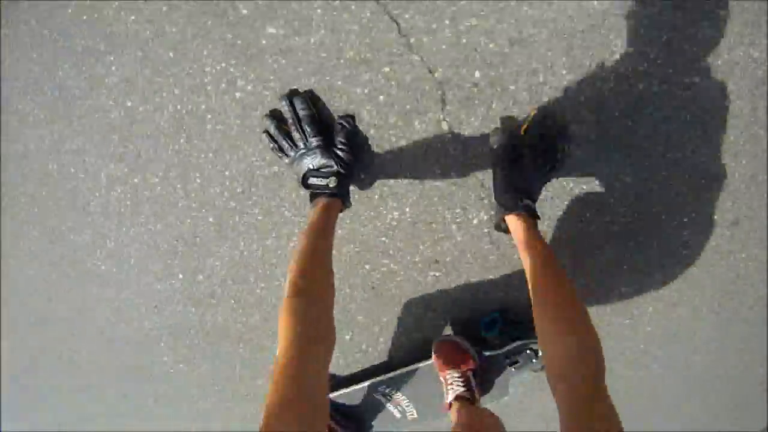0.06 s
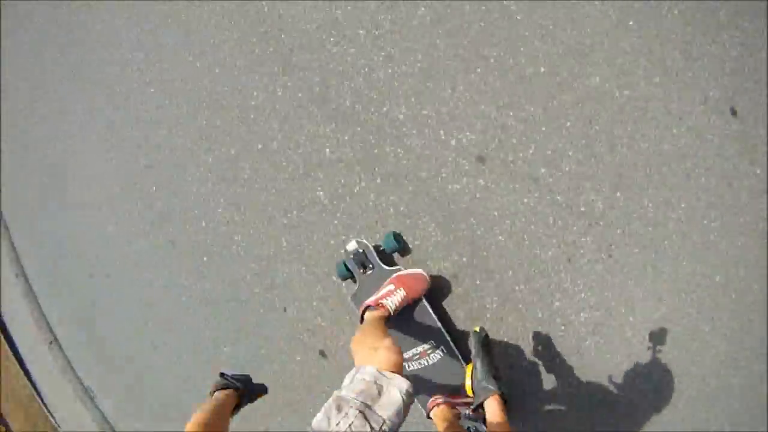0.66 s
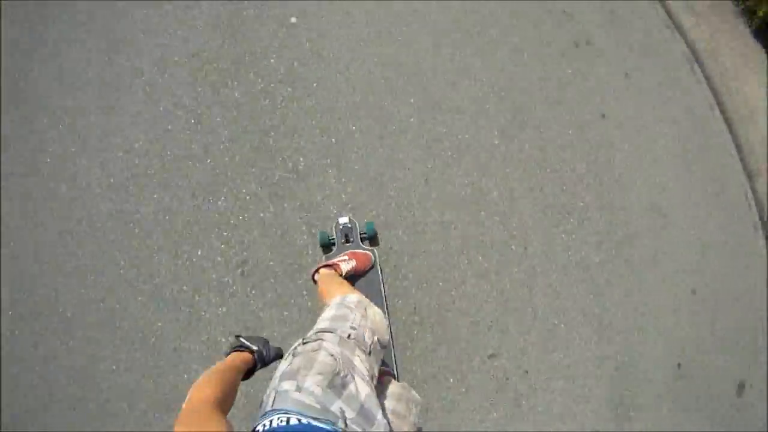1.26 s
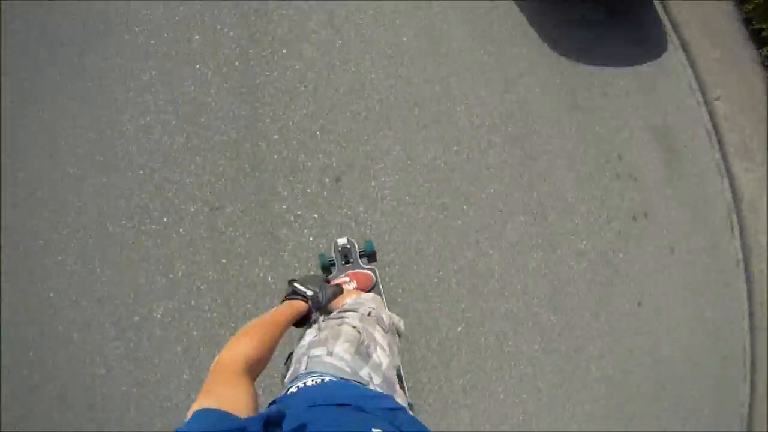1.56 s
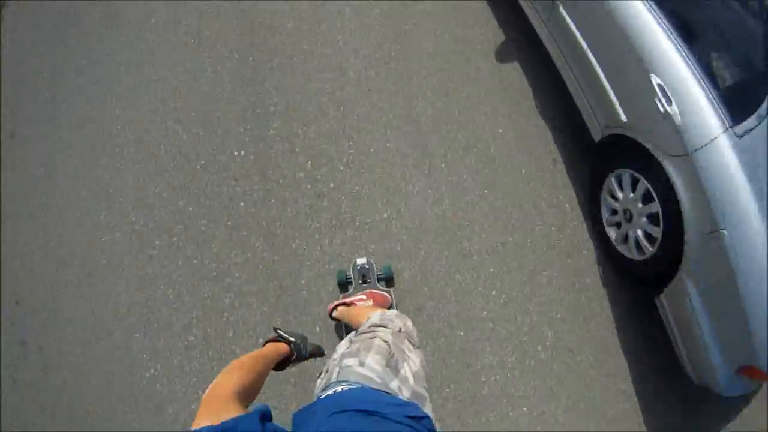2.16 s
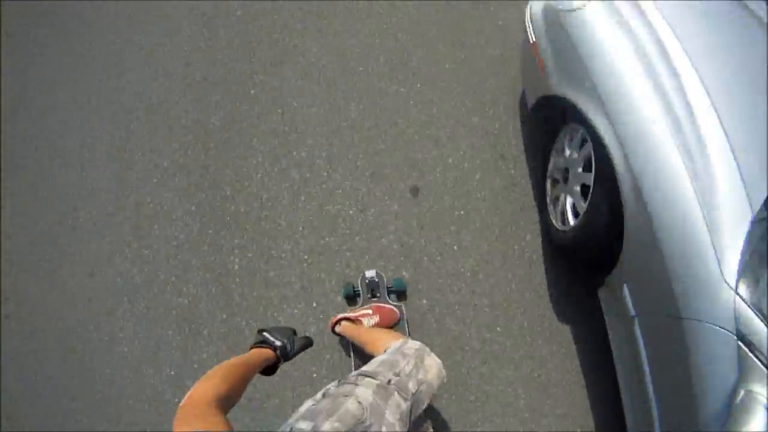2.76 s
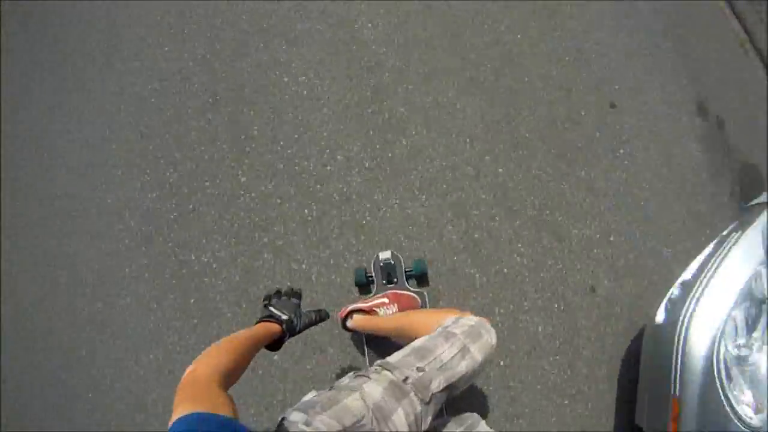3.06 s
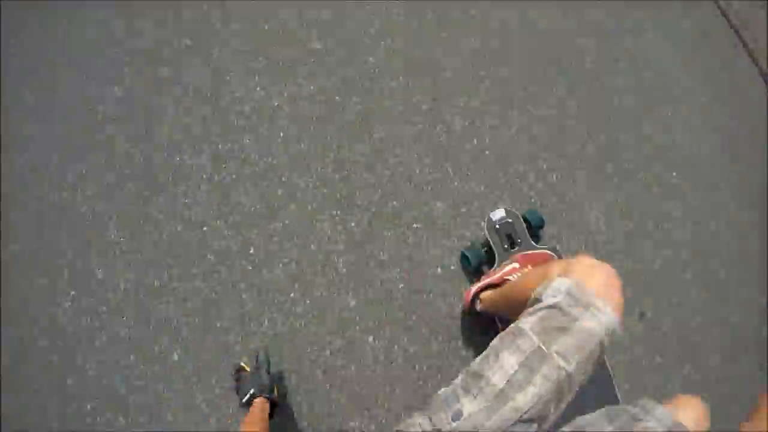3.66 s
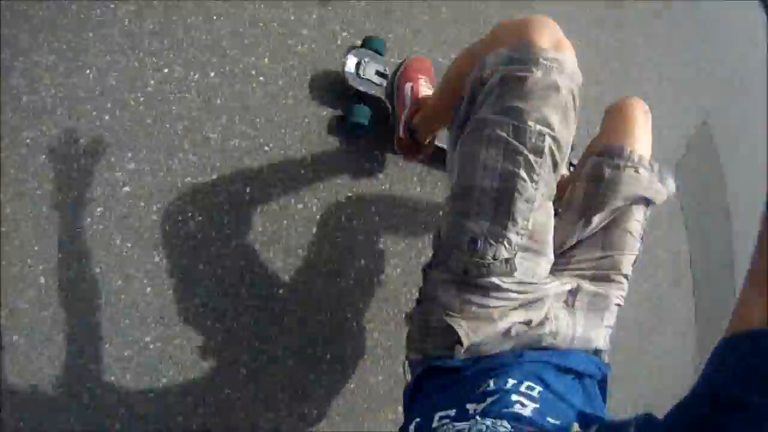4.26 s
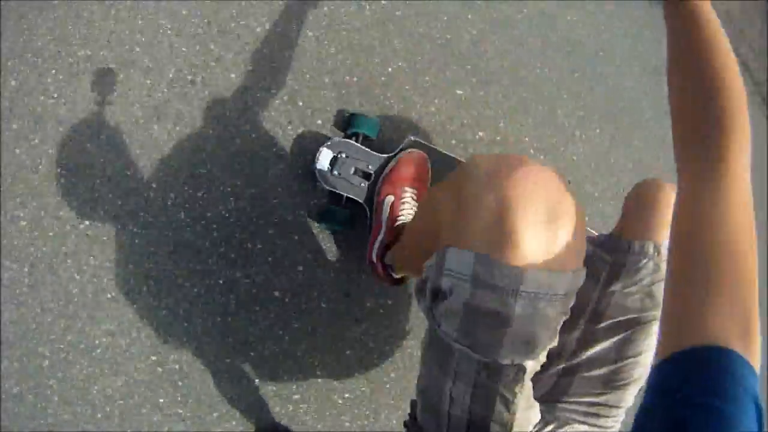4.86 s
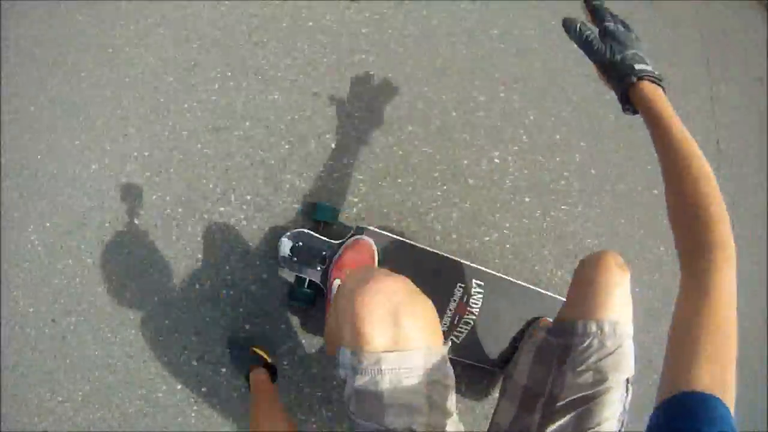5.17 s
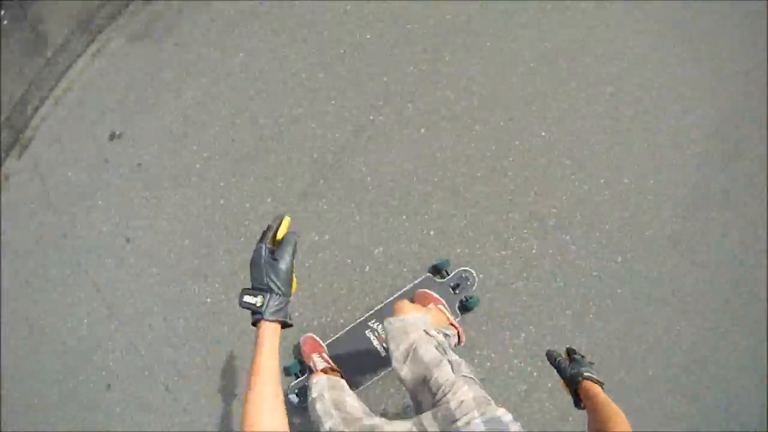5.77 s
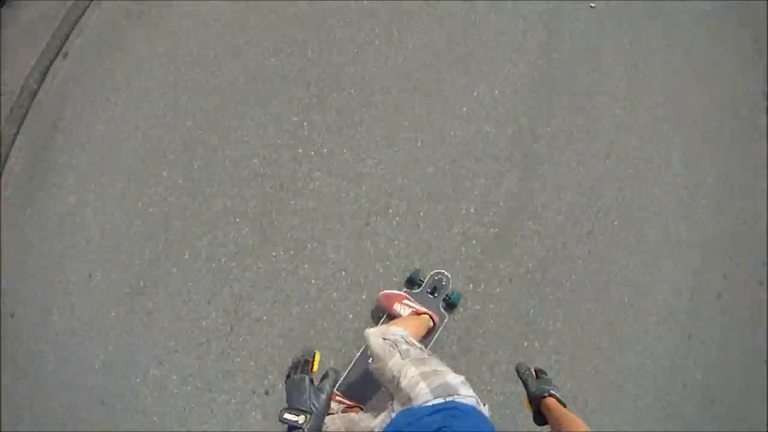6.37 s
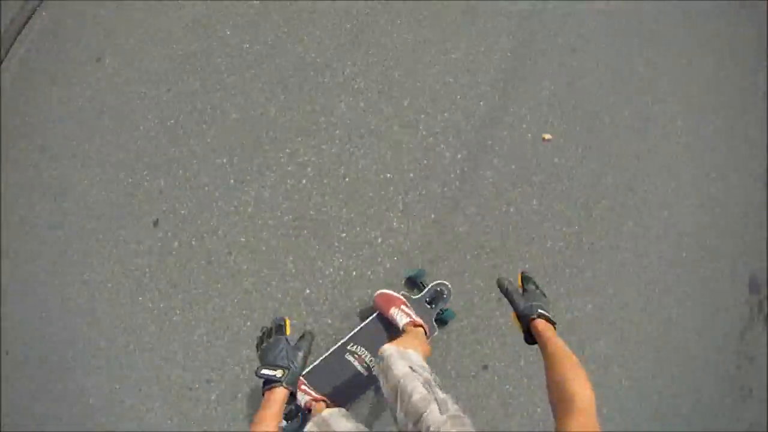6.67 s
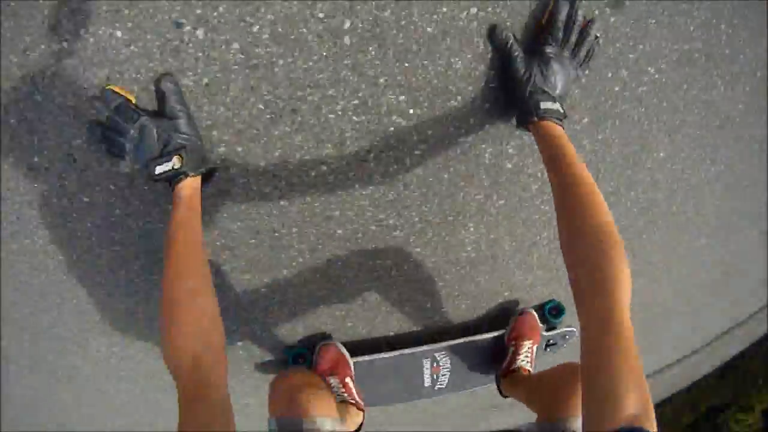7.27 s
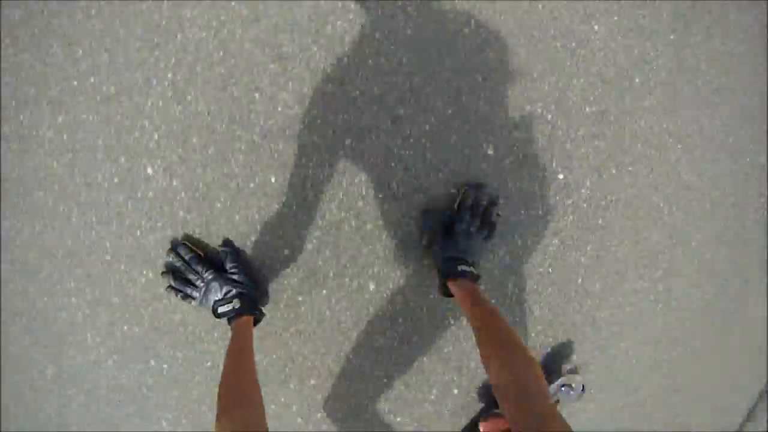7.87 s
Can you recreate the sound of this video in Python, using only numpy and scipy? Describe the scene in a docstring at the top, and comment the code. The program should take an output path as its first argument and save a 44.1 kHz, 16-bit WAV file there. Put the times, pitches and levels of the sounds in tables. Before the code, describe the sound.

Hard glove pucks rasp briefly across asphalt, then longboard wheels patter and rumble along the street while wind gusts on a helmet-mounted microphone. The wheels break into a longer sideways scrape that swells before they grip again. After more rolling and light scrubbing, the pucks hit the road and grind loudly, with a faint rising tone and knocks from the helmet mount. Everything sounds close and slightly boxy, with a glassy edge.

```python
"""An asphalt street: a longboard run, heard from a cased camera on the rider's helmet.
Three stick-slip slides: on glove pucks, on drifting wheels with one glove touching down, on pucks again.
The wheels patter over grit and scrub in carves; the deck rumbles, the mount clacks.
Short ticks and pops: flicked pebbles, a small rattle, a soft wind or cloth pop.
Wind buffets the case, which colours the road noise; a slow sample-and-hold adds a glassy treble."""
import sys
import numpy as np
from scipy import signal
from scipy.fft import rfft, irfft, next_fast_len
from scipy.io import wavfile
from scipy.ndimage import uniform_filter1d, map_coordinates

SR = 44100
rng = np.random.default_rng(int(sys.argv[2]) if len(sys.argv) > 2 else 0)


def waveform_to_disk(signal):
    """Save audio, clipped to [-1, 1], as 16-bit WAV at the path in sys.argv[1]."""
    frames = np.transpose(np.atleast_2d(signal))
    scaled = np.clip(frames, -1, 1) * 32767
    samples = np.round(scaled).astype(np.int16)
    wavfile.write(sys.argv[1], SR, samples)


N = 353681
TIME_S = np.arange(N) / SR
FREQ_HZ = np.fft.rfftfreq(8192, 1 / SR)

# slides: start/s, end/s, level/dB, fade/(dB/s), relative hiss/dB, body growth/(dB/s), grip swell/dB,
# case weight, chatter/dB
SLIDES = [(0.0, 0.437, -26, 0, -20.5, -5, -4, 1.1, 0), (3.764, 5.245, -39.5, 1.5, -15, 0, 11.5, 0.73, 1.4),
          (7.315, 8.2, -33, 3, -12.5, 3.5, 0, 0.81, -0.1)]
# two rising tones in the scrape, one curve a slide: t/s, lower f/Hz, lower gain, upper gain
SCRAPE_TONES = [
    [(0.08, 1670, 1.2, 0.36), (0.22, 1780, 1.4, 0.11), (0.33, 1980, 2.1, 0.3), (0.43, 2070, 3.2, 0.54)],
    [(3.85, 1760, 0.41, 0.1), (4.0, 1760, 0.05, 0.7), (4.42, 1730, 0.05, 1.4), (4.68, 1950, 0.05, 1.9),
     (5.05, 2050, 0.05, 1.1), (5.15, 2270, 0.05, 0.1)],
    [(7.33, 1460, 0.1, 0.6), (7.46, 1670, 0.41, 1.9), (7.56, 1900, 0.28, 1.1), (7.66, 2130, 0.48, 0.4),
     (7.8, 2400, 0.09, 0.59), (7.98, 2540, 0.12, 1.5)],
]
# wheel noise, brighter under sideways load: t/s, level/dB, treble tilt/dB
ROLL = [(0.46, -45, 5.5), (0.68, -51.5, 1.5), (0.95, -50.5, -1), (1.48, -52.5, -3.5), (1.66, -55.5, -3),
        (1.81, -51.5, -3), (2.1, -55.5, -1.5), (2.38, -50.5, -2.5), (3.2, -49.5, -1), (3.65, -45.5, -1.5),
        (4.4, -45.5, 0.5), (4.75, -53.5, -0.5), (5.3, -53.5, 1), (5.52, -53, 1.5), (5.66, -54, -0.5),
        (6.5, -56.5, -3.5), (6.66, -49, -3.5), (7.2, -52.5, 1.5)]
# a loaded glove or wheel shakes rider and helmet: t/s, half length/s, level/dB
JUDDERS = [(0.07, 0.074, -35), (0.26, 0.076, -39.5), (4.367, 0.035, -51), (6.336, 0.039, -46)]
# pucks and wheels biting the road: t/s, level/dB, rise/s
BITES = [(.017, -30.5, 0.015), (.128, -24.5, 0.016), (.263, -27, 0.0044), (0.387, -24, 0.006),
         (0.425, -46, 0.0031), (3.768, -33, 0.0032), (3.776, -31, 0.0082), (3.833, -34.5, 0.0047),
         (3.862, -32, 0.0057), (4.1, -37, 0.0077), (4.483, -34, 0.022), (4.593, -36, .014),
         (5.074, -42, 0.0036), (5.878, -53, 0.012), (5.912, -46.5, 0.0045), (6.145, -56.5, 0.014),
         (7.234, -23, 0.0074), (7.26, -24.5, 0.0058), (7.271, -30, 0.018), (7.3042, -25, 0.0028),
         (7.312, -29, 0.0045)]
# mount jolts: t/s, relative clack/dB, clack cutoff/Hz, relative thud/dB
JOLTS = [(.177, -21.5, 900, -22), (0.351, -20, 1090, -25), (7.304, -24.5, 1610, -28),
         (7.369, -25.5, 900, -21), (7.49, -9.5, 800, -17), (7.503, -18, 500, -4.5), (7.563, -18, 800, -26),
         (7.576, -13.5, 2600, -3.5)]
# modes of mount and helmet: f/Hz, level/dB, t60/s
CLACK_MODES = [(186, -2, 0.026), (242, -8.5, 0.079), (586, 1.5, 0.012), (696, 4.5, 0.03), (860, 4.5, 0.01),
               (1360, 1.5, 0.032), (1803, 1, 0.035), (2170, -1, 0.021)]
THUD_MODES = [(35, -8.5, 0.26), (68.6, 1.5, 0.056), (110, -17, 0.092)]
# short ticks and pops: t/s, level/dB, centre f/Hz
TICKS = [(0.9, -53, 610), (0.962, -48, 700), (1.45, -55, 785), (3.292, -36.5, 2220), (3.608, -38.5, 2260),
         (3.612, -39, 1330), (4.288, -35.5, 1450), (5.56, -39.5, 2340), (5.658, -52, 1480),
         (5.761, -45, 1890), (5.9, -50, 1100), (6.296, -52.5, 860), (6.328, -49, 752), (7.15, -50, 3800)]
# wheels straightening after a slide: t/s, level/dB, fade/(dB/s)
WHINES = [(0.436, -47, 49), (5.24, -62, 19)]
# wheels scrubbing in carves: start/s, end/s, level/dB, fade/(dB/s)
CARVES = [(0.44, 1.1, -63, 10), (5.86, 6.26, -63.5, -2), (6.61, 6.84, -55.5, 8), (6.843, 7.25, -51.5, 20)]
# gusts as the rider swings round: t/s, half length/s, level/dB
GUSTS = [(0.113, 0.048, -42), (0.324, 0.065, -39), (4.014, 0.14, -40), (4.354, 0.078, -34.5),
         (4.537, 0.059, -27.5), (4.84, 0.18, -40), (5.933, 0.07, -31), (6.327, 0.091, -36),
         (6.8, 0.35, -42), (7.486, 0.17, -32.5)]
# camera case resonances: f/Hz, width/Hz, gain/dB
CASE_MODES = [(267, 33, 2.5), (406, 117, 6), (732, 330, 9), (1063, 87, 5), (1200, 160, 5.5), (1408, 120, 7),
              (1847, 390, 8), (2199, 240, 10), (2487, 285, 13), (2938, 210, 10), (3296, 81, 7.5),
              (3643, 390, 16.5), (4430, 130, -7), (3840, 37, 3.5), (4920, 170, 4), (5160, 210, -1.5)]
# source spectra: f/Hz, relative level/dB
FIRST_PUCK_SPECTRUM = [(180, -46), (300, -37), (893, -16.5), (1420, -6.5), (1570, -12), (1850, -5.5),
                       (2340, -12.5), (2530, -1), (3090, -11), (3680, -6), (6000, -11.5), (7800, -56),
                       (13200, -120)]
DRIFT_SPECTRUM = [(120, -27), (200, -21), (730, -13.5), (904, -20.5), (1060, -2.5), (1530, -13), (1840, 0),
                  (2090, -12), (2510, -0.5), (2740, -7.5), (3800, -16), (4330, -16), (4750, -14),
                  (6000, -22.5), (7800, -44), (13200, -120)]
LAST_PUCK_SPECTRUM = [(180, -55), (300, -28), (678, -12), (882, -14.5), (1090, -3.5), (1600, -3.5),
                      (1850, 0), (2150, -2.5), (2480, 1.5), (3090, -7), (3680, -9.5), (4500, -18),
                      (4900, -16.5), (6000, -18.5), (7800, -79), (13200, -120)]
ROLL_SPECTRUM = [(160, -52.5), (280, -6.5), (357, -9), (505, -6.5), (714, -2), (971, -7.5), (1060, -2),
                 (1560, -5.5), (1940, -1), (3330, -17.5), (3690, -19), (6000, -24.5), (7800, -70),
                 (13200, -120)]
RUMBLE_SPECTRUM = [(26, -12), (45, -11), (71, 2.5), (168, -13.5), (221, -14.5), (258, -14), (355, -27),
                   (400, -25.5), (520, -45), (880, -120)]
SCRUB_SPECTRUM = [(1000, -12), (2200, -2), (2900, -11), (3200, -9), (3450, -6), (3670, -10.5), (3950, -10),
                  (4450, -28.5), (4800, -14), (6000, -19)]
WIND_SPECTRUM = [(5, -8.5), (22, 4), (42, -3), (58, -2), (80, -12), (130, -41.5), (300, -33.5),
                 (1000, -50.5)]


def slide(row, spectrum, tones):
    """Stick-slip: clumps of tiny impacts, hissier at both ends where contact is light."""
    start_s, end_s, db, fade_db_s, hiss_db, growth_db_s, grip_db, case_weight, chatter_db = row
    length_s = end_s - start_s
    age_s = np.clip(TIME_S - start_s, 0, length_s)
    unload_s = 0.052 * length_s
    level_db = db - fade_db_s * age_s + grip_db * hump(end_s - 0.047, half_s=0.036)
    level_db += 0.4 * wander(rate_hz=19)
    light_db = 5 * np.exp(-age_s / 0.12) + 7.5 * hump(end_s - unload_s, unload_s)
    slips = grit(hits_per_s=3000, spread_db=3, bed=0.7) * gain(chatter_db * wander(rate_hz=68))
    scrape = coloured(slips, spectrum, case_weight)
    hiss = treble(scrape, edge_hz=3560)
    body = scrape - treble(scrape, edge_hz=2700)
    middle = scrape - hiss - body
    body_gain = gain(growth_db_s * (age_s - length_s / 2))
    sound = middle + body * body_gain + unit_rms(hiss) * gain(hiss_db + light_db)
    return (sound + scrape_tones(sound, tones)) * gain(level_db) * gate(start_s, end_s, edge_s=0.011)


def scrape_tones(scrape, tones, width_hz=193, upper_ratio=1.685):
    """Two rising, wavering tones in the scrape."""
    hz, lower, upper = curves(tones)
    hz = hz * (1 + 0.014 * wander(rate_hz=11))
    return sum(share * resonate(scrape, hz * ratio, width_hz) * gain(1.7 * wander(rate_hz=16))
               for ratio, share in [(1, lower), (upper_ratio, upper)])


def body_reflection(x, share, delay_s, sway):
    """Adds the echo off the rider's moving arms and body: a gliding comb."""
    lag_s = delay_s * (1 + sway * wander(rate_hz=0.33))
    echo = map_coordinates(x, [(TIME_S - lag_s) * SR], order=1)
    return (x + share * echo) / np.hypot(1, share)


def rolling(cruise_db=-49):
    """Wheels patter over stones; the deck rumbles along, less under sideways load."""
    level_db, tilt_db = curves(ROLL)
    stones = grit(hits_per_s=2200, spread_db=1, bed=1) * gain(1.16 * wander(rate_hz=16))
    patter = coloured(stones, ROLL_SPECTRUM, case_weight=0.86)
    bright = treble(patter, edge_hz=1070)
    wheels = (patter - bright) * gain(-tilt_db / 2) + bright * gain(tilt_db / 2)
    rumble = coloured(rng.standard_normal(N), RUMBLE_SPECTRUM, case_weight=0.5)
    rumble_db = -49.5 + 0.49 * (level_db - cruise_db) - 0.96 * tilt_db
    return wheels * gain(level_db) + rumble * swelling(rumble_db, JUDDERS)


def bites():
    """A puck or wheel lands and rasps briefly."""
    force = np.zeros(N)
    for at_s, db, rise_s in BITES:
        rise = TIME_S[:SR // 5] / rise_s
        add(force, at_s, gain(db) * (rise * np.exp(1 - rise)) ** 1.8)
    return force * coloured(rng.standard_normal(N), LAST_PUCK_SPECTRUM, case_weight=1.55)


def jolts():
    """The mount clacks against its stop; the helmet thuds."""
    out, t = np.zeros(N), TIME_S[:SR // 4]

    def mode(hz, db, t60_s):
        return gain(db - 60 * t / t60_s) * np.sin(2 * np.pi * hz * t)

    for at_s, clack_db, cutoff_hz, thud_db in JOLTS:
        clack = sum((-1) ** k * mode(hz, db, t60_s) / np.hypot(1, (hz / cutoff_hz) ** 2)
                    for k, (hz, db, t60_s) in enumerate(CLACK_MODES))
        thud = sum(mode(*row) for row in THUD_MODES)
        add(out, at_s, gain(clack_db - 7) * clack - gain(thud_db - 6.5) * thud)
    return out


def ticks(decay_s, half_width_oct):
    """Short ticks and pops: flicked pebbles, a small rattle, a soft wind or cloth pop."""
    out, t = np.zeros(N), TIME_S[:SR // 10]
    for at_s, db, hz in TICKS:
        burst = rng.standard_normal(len(t)) * np.exp(-t / decay_s)
        skirts = (np.log2((FREQ_HZ + 1) / hz) / half_width_oct) ** 4
        top_cut = (FREQ_HZ / hz) ** 14
        tick = filtered(burst, 1.6 * case_db() - 10 * np.log10(1 + skirts + top_cut))
        add(out, at_s, gain(db) * tick / np.std(tick[:SR // 150]))
    return out


def whine(hz, width_hz):
    """The tread, still creeping sideways, rings in one fuzzy, dying note."""
    note = grit(hits_per_s=2500, spread_db=4, bed=0.87)
    for _ in range(2):
        note = resonate(note, np.full(N, hz), width_hz)
    envelope = sum((TIME_S > at_s) * gain(db - fade_db_s * np.maximum(TIME_S - at_s, 0))
                   for at_s, db, fade_db_s in WHINES)
    return unit_rms(note) * envelope


def scrub():
    """Wheel edges creep and hiss in a carve."""
    creep = grit(hits_per_s=2900, spread_db=3.5, bed=0.58)
    envelope = np.zeros(N)
    for start_s, end_s, db, fade_db_s in CARVES:
        age_s = np.clip(TIME_S - start_s, 0, end_s - start_s)
        envelope += gate(start_s, end_s, edge_s=0.037) * gain(db - fade_db_s * age_s)
    return coloured(creep, SCRUB_SPECTRUM, case_weight=1.9) * envelope


def wind(headwind_db, swing_db):
    """Eddies buffet the case in low lumps: headwind plus gusts."""
    eddies = coloured(rng.standard_normal(N), WIND_SPECTRUM, case_weight=0)
    return eddies * swelling(headwind_db, GUSTS) * gain(swing_db * wander(rate_hz=2.6))


def grit(hits_per_s, spread_db, bed):
    """Impacts on single stones of unequal size, over a bed of countless tiny ones."""
    sizes = gain(spread_db * np.minimum(rng.exponential(1, N), 4))
    hits = sizes * rng.choice([-1, 1], N) * (rng.random(N) < hits_per_s / SR)
    return unit_rms(unit_rms(hits) + bed * rng.standard_normal(N))


def case_db():
    """Case resonance peaks and the valleys between, along FREQ_HZ."""
    peaks_db = sum(db / (1 + (2 * (FREQ_HZ - hz) / width_hz) ** 2) for hz, width_hz, db in CASE_MODES)
    return peaks_db - uniform_filter1d(peaks_db, size=150)


def coloured(x, spectrum, case_weight):
    """Applies a source spectrum and the case response; rms 1."""
    hz, db = np.transpose(spectrum)
    source_db = np.interp(np.log(FREQ_HZ + 1), np.log(hz + 1), db)
    return unit_rms(filtered(x, source_db + case_weight * case_db()))


def filtered(x, db):
    """Minimum-phase filter of shape db along FREQ_HZ, peak gain 1."""
    log_gain = np.log(gain(np.maximum(db - db.max(), -100)))
    mirrored = np.concatenate([log_gain, log_gain[-2:0:-1]])
    taps = np.fft.ifft(np.exp(np.conj(signal.hilbert(mirrored)))).real
    return signal.oaconvolve(x, taps[:len(FREQ_HZ)])[:len(x)]


def resonate(x, hz, width_hz):
    """Unity-gain band-pass tracking the curve hz."""
    carrier = np.exp(2j * np.pi * np.cumsum(hz) / SR)
    pole = np.exp(-np.pi * width_hz / SR)
    return 2 * (carrier * signal.lfilter([1 - pole], [1, -pole], x / carrier)).real


def treble(x, edge_hz):
    """Zero-phase high-pass."""
    return signal.sosfiltfilt(signal.butter(4, edge_hz, "high", fs=SR, output="sos"), x)


def wander(rate_hz):
    """Random drift of rms 1, rolling off above rate_hz."""
    length = next_fast_len(N)
    hz = np.fft.rfftfreq(length, 1 / SR)
    spectrum = rfft(rng.standard_normal(length)) / (1 + (hz / rate_hz) ** 2)
    return unit_rms(irfft(spectrum, length)[:N])


def swelling(base_db, swells):
    """Gain of a base level plus swells, summed in power."""
    swell_power = sum(gain(db) ** 2 * hump(at_s, half_s) for at_s, half_s, db in swells)
    return np.sqrt(gain(base_db) ** 2 + swell_power)


def hump(at_s, half_s):
    """Gaussian of height 1."""
    return np.exp(-np.minimum(((TIME_S - at_s) / half_s) ** 2, 50))


def gate(start_s, end_s, edge_s):
    """Window with linear ramps."""
    return np.clip(np.minimum(TIME_S - start_s, end_s - TIME_S) / edge_s + 0.5, 0, 1)


def curves(rows):
    """Timed columns, interpolated per sample."""
    times_s, *columns = np.transpose(rows)
    return [np.interp(TIME_S, times_s, column) for column in columns]


def add(mix, at_s, sound):
    """Mixes a sound in place."""
    part = mix[max(round(at_s * SR), 0):][:len(sound)]
    part += sound[:len(part)]


def gain(db):
    """dB to amplitude."""
    return 10 ** (np.asarray(db) / 20)


def unit_rms(x):
    """Scales to rms 1."""
    return x / np.sqrt(np.mean(x ** 2) + 1e-20)


def scene():
    """Three slides and scattered knocks over rolling and wind; mono."""
    spectra = FIRST_PUCK_SPECTRUM, DRIFT_SPECTRUM, LAST_PUCK_SPECTRUM
    slides = sum(slide(*parts) for parts in zip(SLIDES, spectra, SCRAPE_TONES))
    slides = body_reflection(slides, share=0.43, delay_s=0.002042, sway=0.1)
    knocks = ticks(decay_s=0.0044, half_width_oct=0.39) + bites() + jolts()
    ride = rolling() + wind(headwind_db=-48, swing_db=3) + scrub() + whine(hz=2340, width_hz=320)
    return (slides + knocks + ride)[None]


def record(dry):
    """Converter: each slow sample, held four times, mirrors the scrape into a glassy, band-limited top."""
    hold_hz, alias_cut_hz, edge_hz = 12000, 5800, 15400
    smooth = signal.oaconvolve(dry, signal.firwin(101, alias_cut_hz, fs=SR)[None], "same")
    slow = signal.resample_poly(smooth, hold_hz, SR, axis=1)
    held = signal.resample_poly(np.repeat(slow, 4, axis=1), SR, 4 * hold_hz, axis=1)[:, :N]
    band_limit = signal.firwin(511, edge_hz, window=("kaiser", 9), fs=SR)
    return signal.oaconvolve(held, band_limit[None], "same")


dry = scene()
out = record(dry)
waveform_to_disk(out)
```